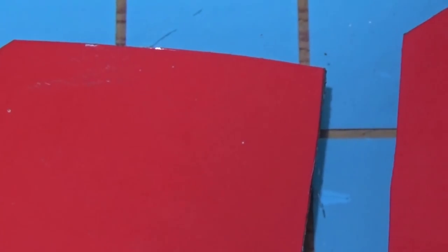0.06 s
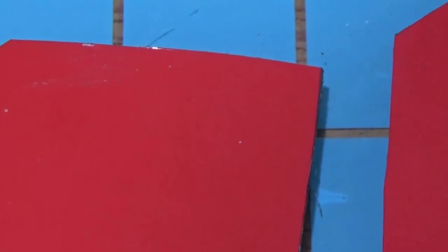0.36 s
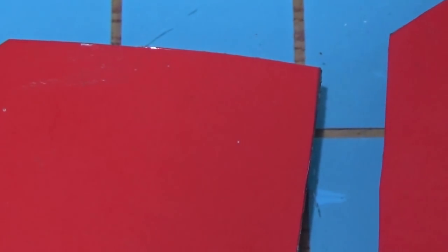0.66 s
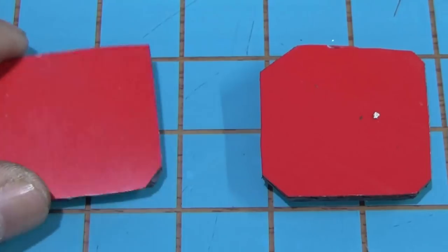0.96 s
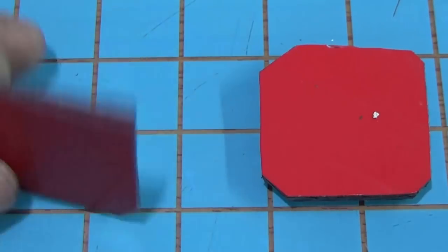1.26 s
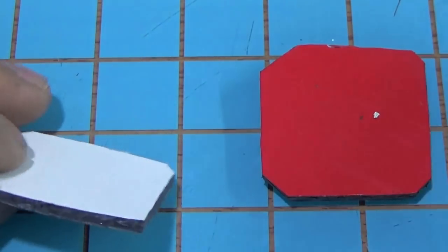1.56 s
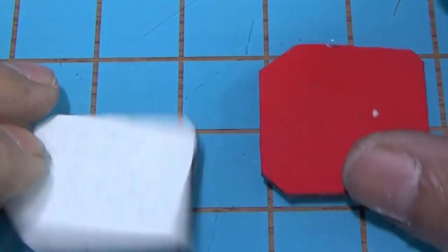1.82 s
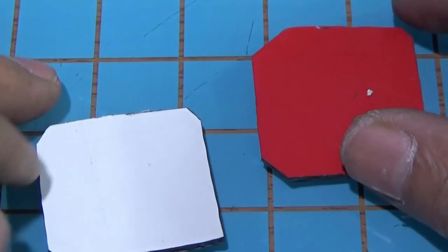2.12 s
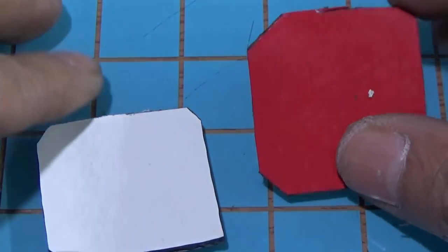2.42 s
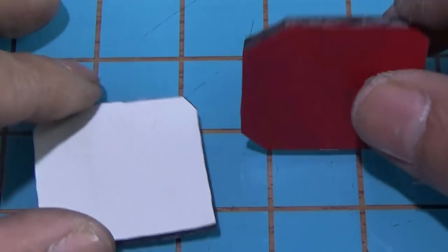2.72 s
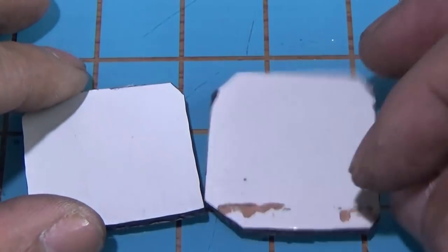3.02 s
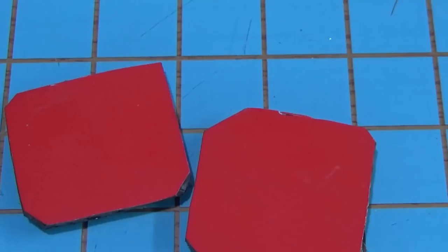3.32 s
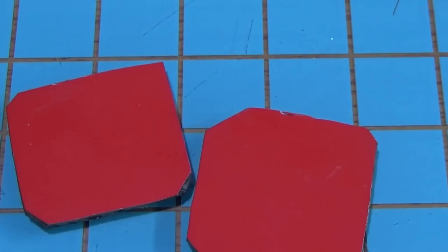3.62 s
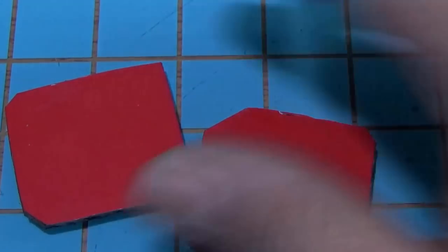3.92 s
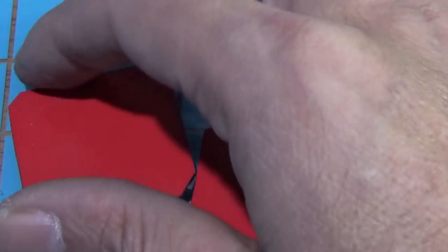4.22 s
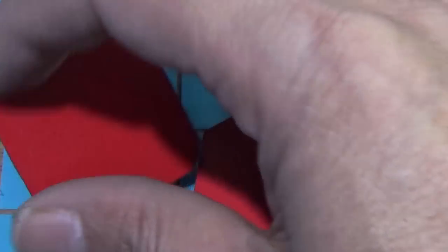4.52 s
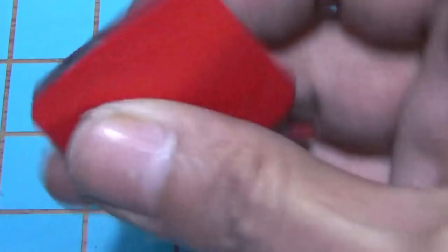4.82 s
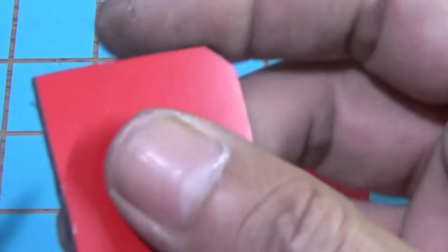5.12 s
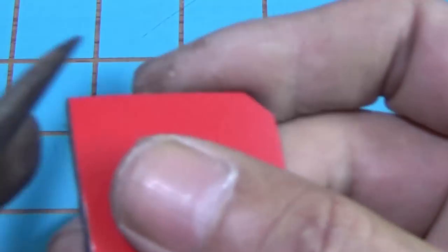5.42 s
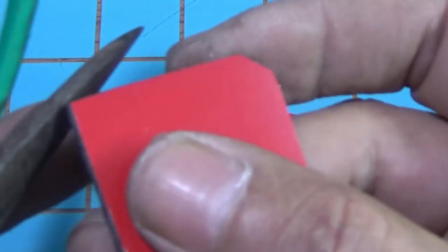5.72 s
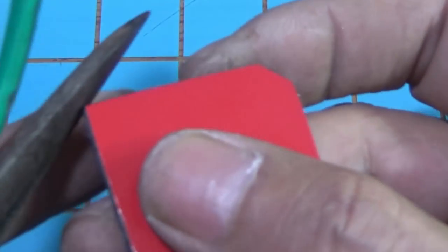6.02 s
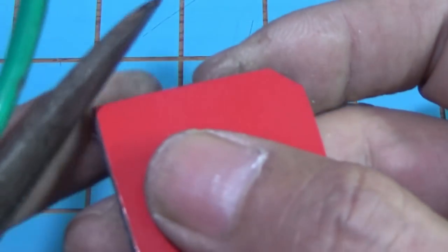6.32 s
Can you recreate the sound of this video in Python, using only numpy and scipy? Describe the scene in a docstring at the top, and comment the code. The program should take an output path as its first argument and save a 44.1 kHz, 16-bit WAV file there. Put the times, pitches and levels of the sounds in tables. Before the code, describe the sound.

A faint, low room hum with a little hiss runs throughout, easing slightly after the first second. Right at the start, thick card gives a quick cluster of light ticks on a plastic cutting mat, close to the microphone. From about 1.2 to 1.4 seconds come several sharp taps as a piece is turned over. Near 1.8 seconds it lands hard and chatters briefly as it settles. Fingers slide softly on card around 2.6 seconds. A tap at 2.9 seconds leads into the loudest landing, another short clatter just after 3 seconds. A small clink follows near 3.4 seconds, then a very faint, high, wavering squeak and a soft swish as a hand reaches in, around 3.7 to 4.2 seconds. From there until about 6.3 seconds there are only quiet ticks, tiny skitters and short hissy finger slides. The taps carry a short, small-room echo.

```python
"""Over the hum of a small room, squares of thick card are turned over on a plastic cutting mat, close up.
Each contact knocks the mat, rings the card and snaps at its edge; between contacts, fingers slide on card.
Near 1.8 s and 3 s, dropped pieces land hard and chatter as they settle. Something clinks, then squeaks
faintly as a hand reaches in, and the last two seconds hold only soft touches and slides."""
import sys
import numpy as np
from scipy import signal
from scipy.fft import rfft, irfft
from scipy.io import wavfile
from scipy.ndimage import uniform_filter1d, minimum_filter1d

SR = 44100
rng = np.random.default_rng(int(sys.argv[2]) if len(sys.argv) > 2 else 0)


def dump_mix(stems):
    """Bounce the given channels to the path in sys.argv[1] as a 16-bit WAV at rate SR."""
    frames = np.atleast_2d(stems).T  # one column per channel
    limited = np.clip(frames, -1, 1)  # hard clip at full scale
    pcm = np.round(limited * 32767).astype(np.int16)
    wavfile.write(sys.argv[1], SR, pcm)


N = 284886


def amp(db):
    """Decibels to linear gain."""
    return 10 ** (np.asarray(db) / 20)


def unit_rms(x):
    """Scales to an rms of 1."""
    return x / np.sqrt(np.mean(x ** 2) + 1e-20)


def unit_hit(x):
    """Scales a short sound to the energy of 1 ms at an rms of 1."""
    return x / np.sqrt(np.sum(x ** 2) * 1000 / SR + 1e-20)


def curve_at(points, hz):
    """Reads a curve on a log-frequency axis."""
    freq_hz, value = np.transpose(points)
    return np.interp(np.log(hz + 1), np.log(freq_hz + 1), value)


def add(mix, start_s, sound):
    """Mixes a sound in at start_s."""
    part = mix[max(round(start_s * SR), 0):][:len(sound)]
    part += sound[:len(part)]


def click(spectrum, size=2048):
    """The tightest (minimum-phase) click with this spectrum."""
    log_gain = np.log(amp(curve_at(spectrum, abs(np.fft.fftfreq(size, 1 / SR)))))
    return np.fft.ifft(np.exp(np.conj(signal.hilbert(log_gain)))).real[:size // 2]


def drift(rate_hz):
    """Smooth random modulation with an rms of 1."""
    hz = np.fft.rfftfreq(N, 1 / SR)
    return unit_rms(irfft(rfft(rng.standard_normal(N)) * np.exp(-(hz / rate_hz) ** 2), N))


def decay(t, t60_s):
    """An envelope that loses 60 dB in t60_s."""
    return np.exp(-np.log(1000) * t / np.maximum(t60_s, 1e-4))


def room_tone(noise_db=-62.5, wander_hz=3, waver_depth=.3):
    """Room rumble and microphone hiss, with a wavering hum that is stronger at first."""
    noise_spectrum = [(12, -61), (20, -14), (48, -7), (67, -5.5), (86, -18.5), (113, -7.5), (172, -7.5),
                      (234, -3.5), (270, -8), (310, -11), (780, -16), (2320, -22), (9400, -29),
                      (14700, -36), (16000, -47)]  # rumble and hiss: freq_hz, relative_db
    stereo_likeness = [(60, 0.97), (150, 1), (380, 0.82), (950, 0.15), (2380, 0.4), (5980, 0.75),
                       (15000, 1)]  # left against right: freq_hz, correlation
    hum_partials = [(53, -71), (119, -74), (205, -75.5), (312, -73.5)]  # tones of the hum: pitch_hz, level_db
    hum_fader = [(.75, 2.5), (.95, -3)]  # gain on the whole hum: time_s, gain_db
    hz = np.fft.rfftfreq(N, 1 / SR)
    left, unrelated = rfft(rng.standard_normal((2, N))) * amp(curve_at(noise_spectrum, hz))
    likeness = np.clip(curve_at(stereo_likeness, hz), -1, 1)
    right = likeness * left + np.sqrt(1 - likeness ** 2) * unrelated
    air = unit_rms(irfft(np.array([left, right]), N))
    hum = np.zeros(N)
    for pitch_hz, level_db in hum_partials:
        waver = 1 + waver_depth * drift(4)
        cycles = np.cumsum(pitch_hz + wander_hz * drift(9)) / SR
        hum += amp(level_db) * waver * unit_rms(np.sin(2 * np.pi * cycles))
    fader_db = np.interp(np.arange(N) / SR, *np.transpose(hum_fader))
    return amp(noise_db) * air + hum * amp(fader_db)


def room_reverb(send, predelay_s=0.002, build_s=0.0066, side_db=-9):
    """Reflections build within milliseconds and die band by band, nearly alike in both microphones."""
    decay_times = [(150, .2), (400, 0.66), (1060, 0.29), (2790, 0.34), (6000, 0.32), (10000, 0.24),
                   (16000, 0.29)]  # length of the tail: freq_hz, t60_s
    tail_colour = [(200, -8.5), (1200, -5.5), (2500, -11), (6000, -13.5), (10000, -12), (16000, -14)]  # tone of the tail: freq_hz, gain_db
    hz, t, bands = signal.stft(rng.standard_normal((2, SR // 2)), SR, nperseg=256)
    t60_s = np.maximum(curve_at(decay_times, hz), .02)[:, None]
    equal_energy = np.sqrt(2 * np.log(1000) / (t60_s * SR))
    bands *= decay(t, t60_s) * amp(curve_at(tail_colour, hz))[:, None] * equal_energy
    tail = signal.istft(bands, SR, nperseg=256)[1]
    tail *= np.clip((np.arange(tail.shape[1]) / SR - predelay_s) / build_s, 0, 1)
    mid, side = signal.fftconvolve(send[None], tail, axes=1)[:, :N]
    return np.array([mid + amp(side_db) * side, mid - amp(side_db) * side])


def microphone_pair(direct, side_db=-19):
    """The two microphones differ a little through reflections on their housing."""
    t = np.arange(SR // 500) / SR
    housing = rng.standard_normal(len(t)) * t * decay(t, 0.0035)
    side = amp(side_db) * signal.fftconvolve(direct, housing / np.linalg.norm(housing))[:N]
    return np.array([direct + side, direct - side])


def hand_reach(middle_s=3.945, length_s=0.77, level_db=-64.5):
    """One soft swell of rubbing as the hand comes in over the mat."""
    sleeve_spectrum = [(100, -13), (300, 9), (800, -5), (2200, -3.5), (5000, -9.5), (9500, -5.5),
                       (16000, -27)]  # colour of the swish: freq_hz, relative_db
    swell = np.zeros(N)
    add(swell, middle_s - length_s / 2, amp(level_db) * np.hanning(int(length_s * SR)))
    return swell * unit_rms(signal.fftconvolve(rng.standard_normal(N), click(sleeve_spectrum))[:N])


def squeak(waver_hz=110, flicker_db=4):
    """A faint, thin squeak wavers up and down and keeps breaking up."""
    contour = [(3.685, 9600, -74), (3.722, 10220, -68), (3.788, 9430, -80), (3.847, 10030, -64),
               (3.885, 9800, -62), (3.935, 9430, -81)]  # path of the squeak: time_s, pitch_hz, level_db
    partials = [(.605, -13), (0.999, -1), (1.4, -15)]  # its tones: pitch_ratio, relative_db
    t = np.arange(N) / SR
    time_s, pitch_hz, level_db = np.transpose(contour)
    cycles = np.cumsum(np.interp(t, time_s, pitch_hz) + waver_hz * drift(310)) / SR
    tone = sum(amp(db) * np.sin(2 * np.pi * ratio * cycles) for ratio, db in partials)
    envelope = np.interp(t, time_s, amp(level_db), left=0, right=0)
    return envelope * unit_rms(tone * amp(flicker_db * drift(60)))


def clink(scrape_t60_s=0.092):
    """A small hard thing is nudged: a short scrape rings its modes."""
    nudges = [(3.4466, -37)]  # when it is touched: start_s, level_db
    modes = [(2590, -21, 0.0093), (3530, -20, 0.0036), (4720, 1, 0.0092), (6300, 0, .002), (8860, 4, .01),
             (10850, -3, .008), (13400, -18, 0.0018)]  # its resonances: pitch_hz, relative_db, t60_s
    t, out = np.arange(SR // 5) / SR, np.zeros(N)
    body = sum(amp(db) * unit_hit(decay(t, t60_s) * np.sin(2 * np.pi * hz * t))
               for hz, db, t60_s in modes)
    for start_s, level_db in nudges:
        scrape = rng.standard_normal(len(t)) * decay(t, scrape_t60_s)
        add(out, start_s, amp(level_db) * unit_hit(signal.fftconvolve(scrape, body)))
    return out


def finger_slides(scatter_db=2.0, slips_per_s=3500):
    """Skin catches on the fibres of the card in a swell of tiny slips."""
    strokes = [(1.228, 0.068, -59), (2.53, 0.079, -64), (2.645, 0.21, -65.5), (4.577, 0.097, -57.5),
               (4.638, 0.035, -54), (4.876, .17, -54), (4.996, 0.059, -56.5), (5.229, .071, -65),
               (5.638, 0.081, -57.5), (5.877, 0.038, -59.5), (6.118, 0.12, -68), (6.299, 0.017, -62.5)]  # finger strokes: middle_s, length_s, level_db
    skin_spectrum = [(300, -30), (1200, -15), (2300, -7), (5200, -3), (6100, 2.5), (7100, 3.5), (8300, 4),
                     (10500, -1.5), (12500, -6.5), (16000, -15)]  # colour of skin on card: freq_hz, relative_db
    slips = (rng.random(N) < slips_per_s / SR) * rng.standard_normal(N)
    slips *= amp(scatter_db * np.minimum(rng.exponential(1, N), 4))
    hiss = unit_rms(signal.fftconvolve(slips, click(skin_spectrum))[:N])
    pressure = np.zeros(N)
    for middle_s, length_s, level_db in strokes:
        swell = np.sin(np.linspace(0, np.pi, int(length_s * SR)))
        add(pressure, middle_s - length_s / 2, amp(level_db) * swell)
    return hiss * pressure


def shudder(pulse, t, t60_s, depth):
    """A pulse followed by its dense echoes inside the struck sheet."""
    echoes = depth * rng.standard_normal(len(t)) * decay(t, t60_s) * (1 - decay(t, 0.0017))
    echoes[0] += 1
    return signal.fftconvolve(echoes, pulse)[:len(t)]


def card_contact(level_db, snap_db, pitch_hz, ring_t60_s, knock_db, mat_pitch_ratio, mat_t60_s):
    """Card meets mat once: the card rings, and against that ring the mat knocks and the edge snaps."""
    card_modes = [(1.006, 27.5, 0.83), (1.2, 10.5, 1), (1.055, -10.5, 0.72), (1.1, -21, 0.66),
                  (1.9, -14.5, .5), (1.2, -26.5, .6)]  # bending modes of the card: pitch_ratio, relative_db, t60_ratio
    mat_spectrum = [(40, -42.5), (250, -14.5), (560, -20.5), (800, -10), (1350, -2.5), (1700, -0.5),
                    (2100, 4), (2800, -3), (3400, -1), (4500, -7), (7000, -6.5), (16000, -38)]  # knock of the mat on the desk: freq_hz, relative_db
    edge_spectrum = [(1000, -36.5), (5000, 4.5), (7100, -2), (8000, 10), (8700, 7.5), (9600, 8.5),
                     (10800, -1), (12300, -10), (14200, -2.5), (16500, -32.5)]  # snap of a card edge: freq_hz, relative_db
    t = np.arange(SR // 12) / SR
    # the spot that lands shifts the pitch and decides how strongly each mode sounds
    pitch_hz = pitch_hz * (1 + 0.023 * rng.standard_normal())
    ring = np.zeros(len(t))
    for pitch_ratio, mode_db, t60_ratio in card_modes:
        touch_db, detune = rng.standard_normal(2)
        mode_hz = pitch_hz * pitch_ratio * (1 + .004 * detune)
        ring += amp(mode_db + touch_db) * decay(t, ring_t60_s * t60_ratio) * np.sin(2 * np.pi * mode_hz * t)
    mat_click = click([(hz * mat_pitch_ratio, db) for hz, db in mat_spectrum])
    knock = unit_hit(shudder(mat_click, t, mat_t60_s, depth=.1))
    snap = unit_hit(shudder(click(edge_spectrum), t, t60_s=0.012, depth=0.37))
    knock_gain = amp(knock_db - 0.26 * snap_db)  # an edge pushes the mat less than a face
    return amp(level_db) * unit_hit(unit_hit(ring) + amp(snap_db) * snap + knock_gain * knock)


def card_skitters(bounces=14, scatter_db=3):
    """Unevenly spaced bounces swell and fade as a loose piece rocks or drags on the mat."""
    runs = [(1.801, 0.011, -46, 4600), (1.866, .05, -30, 6350), (3.036, 0.031, -23.5, 5730),
            (4.531, 0.16, -53.5, 4800), (4.797, .08, -52, 6040)]  # runs of tiny bounces: start_s, length_s, crest_db, pitch_hz
    out = np.zeros(N)
    for start_s, length_s, crest_db, pitch_hz in runs:
        for k in range(bounces):
            progress = (k + rng.random()) / bounces
            level_db = crest_db + scatter_db * rng.standard_normal()
            bounce = card_contact(level_db, snap_db=-4, pitch_hz=pitch_hz, ring_t60_s=0.02,
                                  knock_db=-20.5, mat_pitch_ratio=1, mat_t60_s=0.023)
            add(out, start_s + progress * length_s, np.sin(np.pi * progress) * bounce)
    return out


def card_taps(skid_s=.002, skid_db=-20.5, corner_delay_s=(.001, .0026), corner_db=-9, send_count=3):
    """Each tap skids, lands and drops a second corner; returns the direct sound and the reverb sends."""
    # how each move sets a piece down; held card rings low, loose card near 6 kHz:
    # from_s, pitch_hz, ring_t60_s, knock_db, mat_pitch_ratio, mat_t60_s, send_db
    moves = [(0, 4140, 0.02, 8.5, 0.9, 0.05, -1), (1.2, 4440, 0.0084, -2.5, 0.99, 0.079, -2),
             (1.3, 5860, 0.0036, 0, 0.97, 0.016, -4.5), (1.55, 3550, .012, 5, 0.77, 0.022, -6),
             (1.8, 4860, 0.0091, -3, 1.08, 0.025, -10), (1.825, 6150, 0.016, -10, 1.11, 0.012, -2),
             (2.5, 5200, .008, 12, 1, 0.037, 7), (2.9, 5760, 0.0051, -16.5, 1.12, 0.008, 1),
             (2.99, 5890, 0.02, -17, 0.96, 0.033, -1.5), (4.1, 5500, 0.0034, -6, 0.89, 0.033, -2),
             (4.4, 4630, .009, 8, 0.61, 0.042, 1), (4.6, 2440, .02, 7, 1.33, 0.084, 3),
             (5.4, 4600, 0.0067, 22, 0.326, .047, -9), (5.6, 6900, .0042, 9, 1.04, 0.045, -10)]
    taps = [(0.0565, -35, 1), (0.0683, -28, 1), (0.0768, -25.5, -2), (0.097, -34.5, 4), (0.1005, -26.5, -1),
            (0.279, -52.5, 11), (1.204, -54, -5), (1.2577, -19, -12), (1.2637, -15, -5.5),
            (1.3263, -20.5, -1), (1.3323, -23, -5), (1.4131, -23.5, -10), (1.4208, -24, -10),
            (1.4271, -27.5, -8), (1.569, -40, -10), (1.8115, -20.5, -7), (1.8297, -22, 1),
            (1.8348, -15.5, 0), (1.8386, -20, 0.5), (1.8453, -13.5, -3.5), (1.8496, -19, -3),
            (1.8633, -8, -5.5), (1.8984, -10.5, -3), (1.9218, -26, -9), (2.605, -49.5, -14),
            (2.651, -51, 10), (2.9075, -37, -7.5), (2.9368, -16.5, -13.5), (2.9512, -42, -13.5),
            (3.0041, -11.5, -13), (3.0245, -6.5, 4.5), (3.0278, -19, -13.5), (3.0416, -4.5, -14.5),
            (3.0704, -8.5, 1), (3.0728, -30, -6), (3.0878, -22, -30), (3.0957, -24.5, 4), (4.21, -47, -4),
            (4.5193, -36.5, -4.5), (4.6543, -42.5, -18), (4.865, -49.5, -12), (5.418, -54, -11),
            (5.645, -45, 6.5), (5.884, -51.5, -10)]  # clear contacts with the mat: start_s, level_db, snap_db
    direct, sends = np.zeros(N), np.zeros((send_count, N))
    move_starts_s = [move[0] for move in moves]
    skid_samples = int(skid_s * SR)
    lead_s = skid_samples / SR
    for k, (start_s, level_db, snap_db) in enumerate(taps):
        _, *timbre, send_db = moves[np.searchsorted(move_starts_s, start_s, "right") - 1]
        hit = card_contact(level_db, snap_db, *timbre)
        # the edge skids for an instant before it catches
        skid = rng.standard_normal(SR // 100)[:skid_samples] * np.linspace(0, 1, skid_samples)
        tap = amp(skid_db) * signal.fftconvolve(skid / np.linalg.norm(skid), hit)
        add(tap, lead_s, hit)
        corner_s = lead_s + rng.uniform(*corner_delay_s)
        add(tap, corner_s, card_contact(level_db + corner_db, snap_db, *timbre))
        add(direct, start_s - lead_s, tap)
        add(sends[k % send_count], start_s - lead_s, amp(send_db) * tap)
    return direct, sends


def scene():
    """Taps and handling close to the microphones, their reflections, and the room's hum."""
    taps, sends = card_taps()
    handling = card_skitters() + finger_slides() + clink() + squeak() + hand_reach()
    sends[0] += handling
    close = microphone_pair(taps + handling)
    reflections = sum(room_reverb(send) for send in sends)  # each send is a spot with its own tail
    return close + reflections + room_tone()


def record(dry, ceiling_db=-10, recovery_db_per_s=450, cutoff_hz=16000):
    """A quick limiter holds the sharpest peaks and lets the room swell back; a low-pass follows."""
    over_db = np.maximum(20 * np.log10(abs(dry).max(0) + 1e-9) - ceiling_db, 0)
    recovery_db = np.arange(N) * recovery_db_per_s / SR
    reduction_db = np.maximum.accumulate(over_db + recovery_db) - recovery_db
    gain = uniform_filter1d(minimum_filter1d(amp(-reduction_db), size=25), size=25)
    lowpass = signal.firwin(255, cutoff_hz, window=("kaiser", 8), fs=SR)
    return signal.oaconvolve(dry * gain, lowpass[None], "same", axes=1)


dry = scene()
out = record(dry)
dump_mix(out)
```